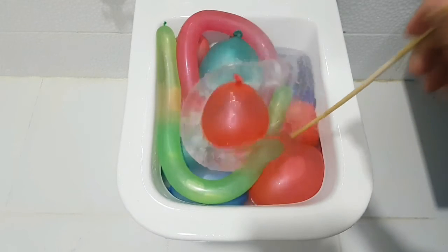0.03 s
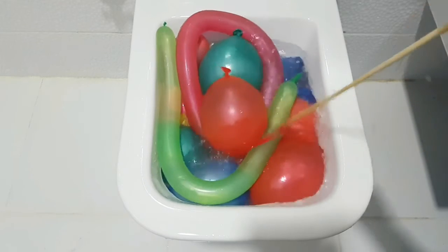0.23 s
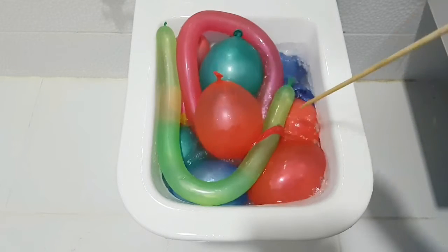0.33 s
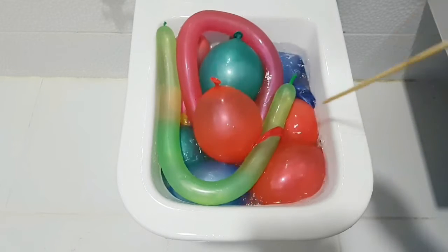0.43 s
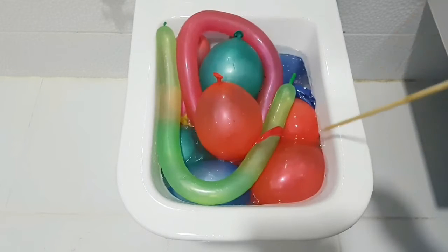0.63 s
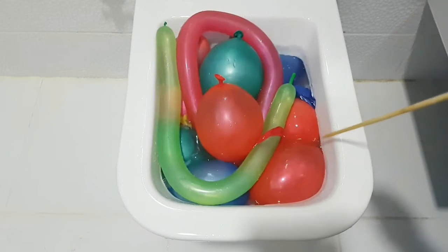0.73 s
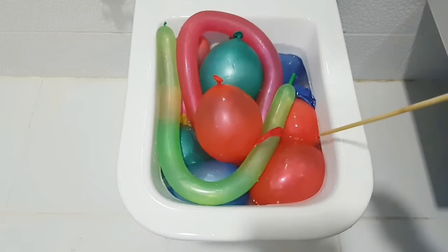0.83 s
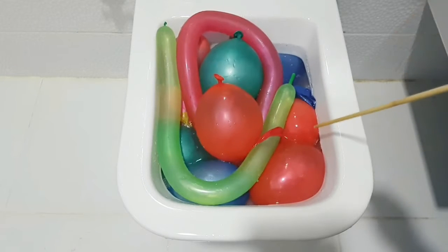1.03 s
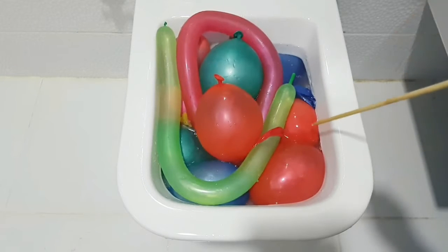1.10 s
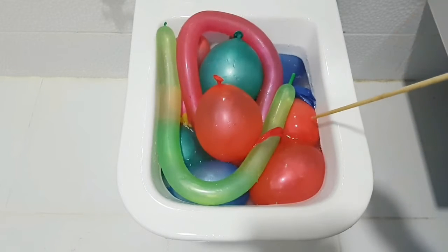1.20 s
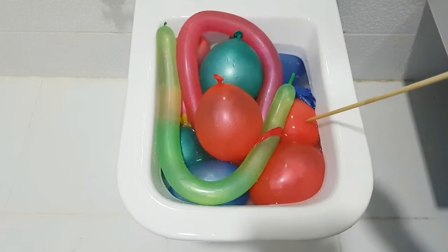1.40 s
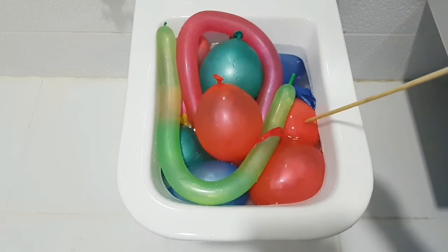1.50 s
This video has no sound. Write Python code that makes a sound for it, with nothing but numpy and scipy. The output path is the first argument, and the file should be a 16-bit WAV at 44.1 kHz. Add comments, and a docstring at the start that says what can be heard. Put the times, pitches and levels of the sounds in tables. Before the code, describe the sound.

A balloon bursts with a sharp, loud bang that rings briefly in a small tiled room.

```python
"""Balloon burst in a tiled room

A long balloon in a basin of balloons is pricked with a stick, in a small tiled room, heard in stereo.
Rubber rips as shaped noise; sharp pressure pulses bounce round the basin and the microphone gets a
deep push. The room answers with decaying noise and sine modes. Scraps rustle and tap (noise), low
thuds ring (sines), and a rumble rises as the stick is pushed at the next balloon, over room tone."""
import sys
import numpy as np
from scipy import signal
from scipy.fft import rfft, irfft
from scipy.io import wavfile

SR = 44100
rng = np.random.default_rng(int(sys.argv[2]) if len(sys.argv) > 2 else 0)


def to_wav(sig):
    """Store sig (one row per channel, or 1-D mono) as 16-bit WAV at the path in sys.argv[1].

    Samples outside -1..1 are clipped; the rate is SR.
    """
    pcm = np.clip(np.atleast_2d(sig), -1, 1) * 32767
    pcm = np.round(pcm).astype(np.int16)
    wavfile.write(sys.argv[1], SR, pcm.T)  # frames by channels


N = 68355  # length [samples]

# Colour of the ripping rubber: (frequency [Hz], relative level per Hz [dB])
RIP_COLOUR = [(60, -44), (110, -29.5), (300, -11.5), (750, -4), (1300, -5.5), (3400, 2.5), (5500, -14.5),
              (8500, -13), (11000, -10.5), (15000, -13)]
# Pressure pulse and its bounces off the basin: (time [s], level [dB], Gaussian width [ms])
PRESSURE_PULSES = [(.20215, 0, .055), (.2033, -11, .09), (.2046, -9, .11)]
# Colour of the room's diffuse ring: (frequency [Hz], relative level per Hz [dB])
ROOM_COLOUR = [(40, -43.5), (100, -30.5), (170, -28.5), (240, -22), (350, -4.5), (500, -6.5), (630, -9),
               (830, -3), (1200, -3), (1700, -2.5), (2400, 0.5), (3300, -1), (5000, -6.5), (8500, -12),
               (12500, -10.5), (15000, -19)]
# Decay of the diffuse ring at its full rate: (frequency [Hz], time to fall 60 dB [s])
ROOM_DECAY = [(100, 0.74), (350, 0.64), (800, 0.72), (2200, 0.5), (4000, 0.43), (7500, 0.39), (13000, 0.31)]
# Standing waves between the tiles: (frequency [Hz], relative level [dB], time to fall 60 dB [s])
STANDING_WAVES = [(330, -9, .8), (392, -6, .73), (518, -5, .7), (771, 1, .45), (834, 1, .5), (962, 0, .45),
                  (1129, -4, .6), (1567, -3, .45), (1672, -1, .42), (1969, 3, .45), (2431, 4, .45),
                  (3290, 2, .38), (3570, -2, .38), (3876, -3, .36), (6491, -7, .35)]
# Likeness of the left and right channels: (frequency [Hz], correlation [-1 to 1])
STEREO_LIKENESS = [(60, .88), (300, .82), (640, .62), (1200, -.15), (2200, .12), (7000, .04), (15000, .03)]
# Stereo balance: (frequency [Hz], left minus right [dB])
STEREO_BALANCE = [(30, -1.5), (150, -4), (380, -5), (750, -3.8), (2400, -2.5), (4400, -2.5), (8500, 0.5),
                  (15000, 2.5)]
# Level of the rustling scraps: (time [s], level [dB])
RUSTLE_LEVELS = [(.4, -67), (.6, -66), (.67, -62), (.8, -67), (.92, -63), (1.101, -73)]
# Colour of the rustle: (frequency [Hz], relative level per Hz [dB])
RUSTLE_COLOUR = [(300, -12.5), (900, 5.5), (2800, -2), (5000, -5), (9000, -8), (14000, -9)]
# Light taps of scraps and stick:
# (time [s], level [dB], centre [Hz], width [octaves], tail level relative to the tap [dB])
LIGHT_TAPS = [(0.665, -50, 1140, 0.98, -4), (0.752, -62.5, 2400, 0.49, 5.5), (.7815, -55, 2980, 2, -9),
              (.911, -44.5, 2100, 0.74, -14), (.926, -53, 2400, 0.78, -9.5), (0.959, -55, 2160, .6, -12),
              (1.437, -52, 13200, 0.26, -30), (1.456, -45, 1500, 0.13, -21.5),
              (1.474, -53.5, 1880, 0.6, -18)]
# Colour of the rumble: (frequency [Hz], relative level per Hz [dB])
RUMBLE_COLOUR = [(25, -12), (50, 4), (85, -12), (150, 1.5), (230, -2.5), (400, -3), (650, -9.5),
                 (1000, -16), (1800, -22), (3500, -38), (8000, -45)]
# Hollow low thuds among the balloons: (time [s], level [dB], frequency [Hz], swell [s])
THUDS = [(.202, -43.5, 184, 0.0052), (0.274, -47.5, 165.6, 0.032), (1.182, -43.5, 157, 0.021),
         (1.264, -53, 132, .008), (1.305, -44, 157, 0.0062), (1.331, -49, 55.5, .012),
         (1.396, -44.5, 390, 0.0033), (1.49, -48.5, 167.3, 0.013)]
# Colour of the room tone: (frequency [Hz], relative level per Hz [dB])
ROOM_TONE_COLOUR = [(25, 2), (48, -3.5), (80, -16.5), (160, -2), (400, -1), (650, -4), (1100, -10),
                    (2400, -16), (4500, -23), (9000, -27.5), (14000, -26.5)]

# T60 is the time a sound takes to fall 60 dB; RIP_RELEASE_S is an exponential time constant.
RIP_S, RIP_LENGTH_S, RIP_ATTACK_S, RIP_RELEASE_S, RIP_DB = .1988, .0045, .00041, .004, -16.5
BURST_LOW_CUT_HZ, PULSE_LEFT_MINUS_RIGHT_DB = 540, .5
REBOUND_HZ, REBOUND_T60_S, REBOUND_DB = 3230, .0016, -9.5  # level relative to its pulse
PUFF_DB, PUFF_HZ, PUFF_T60_S = -44, 37.64, .028
ROOM_START_S, ROOM_BUILD_S, ROOM_DB = .2025, .0084, -17
ROOM_KNEE_S, ROOM_EARLY_SHARE = .09, .6  # until the knee, only this share of the full decay rate
LATE_DB, LATE_STRETCH = -20, 2.84  # a faint ring under the first, this many times longer
MODES_DB = -29
MODE_WIDTH_HZ, MODE_SHARE = 12, .63  # share of the diffuse amplitude removed at each mode
BUMP_T60_S = .089
TAP_ATTACK_S, TAP_T60_S, TAP_TAIL_T60_S = .0008, .02, .55
RUSTLE_GRAIN_DB, RUSTLE_GRAIN_HZ = 3, 298.7
RUMBLE_S, RUMBLE_ATTACK_S, RUMBLE_DB = 1.157, .096, -48
RUMBLE_FADE_START_S, RUMBLE_FADE_DB_PER_S = 1.4, 76
RUMBLE_LUMP_DB, RUMBLE_LUMP_HZ = 1, 45
FLOOR_DB, FLOOR_RISE_DB, FLOOR_RISE_S = -61.5, 1.5, 1
CUTOFF_HZ = 14500


def from_db(db):
    """Decibels to amplitude gain."""
    return 10 ** (np.asarray(db) / 20)


def at_hz(points, hz):
    """Read a table on a log-frequency axis."""
    table_hz, values = np.transpose(points)
    return np.interp(np.log(np.maximum(hz, 1)), np.log(table_hz), values)


def since(s):
    """Seconds since a moment, zero before it."""
    return np.maximum(np.arange(N) / SR - s, 0)


def ramp(s, length):
    """Rise from 0 to 1, starting at a moment."""
    return np.minimum(since(s) / max(length, 1e-5), 1)


def decay(age, t60):
    """Gain of a ring that loses 60 dB in t60 seconds."""
    return np.exp(-np.log(1000) * age / t60)


def pan(db):
    """Left and right gains for a level difference, left minus right."""
    return from_db(np.array([[.5], [-.5]]) * db)


def flutter(db, hz):
    """A randomly wavering gain of rms 1; db is the rms swing, hz the corner of its low-pass."""
    spectrum = rfft(rng.standard_normal(N))
    low_pass = 1 / (1 + (np.fft.rfftfreq(N, 1 / SR) / hz) ** 4)
    slow = irfft(spectrum * low_pass, N)
    gain = from_db(db * slow / slow.std())
    return gain / np.sqrt(np.mean(gain ** 2))


def noise(colour):
    """Random-phase stereo noise of a given colour, likeness and balance; overall rms 1."""
    hz = np.fft.rfftfreq(N, 1 / SR)
    mid, side = np.exp(2j * np.pi * rng.random((2, len(hz))))
    alike = at_hz(STEREO_LIKENESS, hz)
    # side enters the two channels with opposite signs, making them differ
    pair = np.sqrt(1 + alike) * mid + np.sqrt(1 - alike) * side * [[1], [-1]]
    gain = from_db(at_hz(colour, hz)) * pan(at_hz(STEREO_BALANCE, hz)) * (hz > 10)
    x = irfft(pair * gain, N)
    return x / np.sqrt(np.mean(x ** 2))


def burst():
    """The tear races along the rubber; air escapes in narrow pulses, each with a brief rebound."""
    t = np.arange(N) / SR
    rip_envelope = ramp(RIP_S, RIP_ATTACK_S) * np.exp(-since(RIP_S + RIP_LENGTH_S) / RIP_RELEASE_S)
    out = from_db(RIP_DB) * rip_envelope * noise(RIP_COLOUR)
    for s, db, width_ms in PRESSURE_PULSES:
        pulse = np.exp(-.5 * ((t - s) * 1000 / width_ms) ** 2)
        ring = np.sin(2 * np.pi * REBOUND_HZ * since(s)) * decay(since(s), REBOUND_T60_S)
        rebound = from_db(REBOUND_DB) * ring
        out += from_db(db) * pan(PULSE_LEFT_MINUS_RIGHT_DB) * (rebound - pulse)
    low_cut = signal.butter(2, BURST_LOW_CUT_HZ, "high", fs=SR, output="sos")
    return signal.sosfilt(low_cut, out)


def puff():
    """The released air gives the microphone one soft, deep push: a fast-dying low sine."""
    age = since(ROOM_START_S)
    return from_db(PUFF_DB) * np.sin(2 * np.pi * PUFF_HZ * age) * decay(age, PUFF_T60_S)


def room():
    """Dense reflections build up and die away, slowly at first, the top treble soonest."""
    hz = np.fft.rfftfreq(N, 1 / SR)
    field = rfft(noise(ROOM_COLOUR))
    for mode_hz, _, _ in STANDING_WAVES:
        notch = np.exp(-.5 * ((hz - mode_hz) / MODE_WIDTH_HZ) ** 2)
        field = field * (1 - MODE_SHARE * notch)
    age = since(ROOM_START_S)
    slowed_age = age - (1 - ROOM_EARLY_SHARE) * np.minimum(age, ROOM_KNEE_S)
    out = 0
    # overlapping bands that add up to the whole field, each with its own decay
    centres = np.geomspace(60, 15000, 17)
    for centre, weights in zip(centres, np.eye(len(centres))):
        band = irfft(field * at_hz(np.c_[centres, weights], hz), N)
        t60 = at_hz(ROOM_DECAY, centre)
        late = from_db(LATE_DB) * decay(age, LATE_STRETCH * t60)
        out = out + band * np.hypot(decay(slowed_age, t60), late)
    return from_db(ROOM_DB) * ramp(ROOM_START_S, ROOM_BUILD_S) * out


def standing_waves():
    """The room's strongest modes ring as sines, in a different phase at each microphone."""
    age = since(ROOM_START_S)
    out = 0
    for hz, db, t60 in STANDING_WAVES:
        # this phase gap gives the sine the wanted left-right correlation
        gap = rng.choice([-1, 1]) * np.arccos(at_hz(STEREO_LIKENESS, hz))
        phase = rng.uniform(0, 2 * np.pi) + np.array([[.5], [-.5]]) * gap
        gain = from_db(MODES_DB + db) * pan(at_hz(STEREO_BALANCE, hz))
        out = out + gain * np.sin(2 * np.pi * hz * age + phase) * decay(age, t60)
    return ramp(ROOM_START_S, ROOM_BUILD_S) * out


def bumps():
    """Each thud swells and rings out on one low note."""
    out = 0
    for s, db, hz, swell in THUDS:
        gain = from_db(db) * pan(at_hz(STEREO_BALANCE, hz))
        envelope = ramp(s, swell) * decay(since(s + swell), BUMP_T60_S)
        out = out + gain * envelope * np.sin(2 * np.pi * hz * since(s))
    return out


def taps():
    """Each tap is a short noise burst around one pitch, with a longer tail of the same colour."""
    out = 0
    grid_hz = np.geomspace(50, 16000, 80)
    for s, db, hz, octaves, tail_db in LIGHT_TAPS:
        off = np.log2(grid_hz / hz) / octaves
        colour = -20 * np.log10(1 + off ** 2 + (off / 1.4) ** 4)
        tail = from_db(tail_db) * decay(since(s), TAP_TAIL_T60_S)
        envelope = ramp(s, TAP_ATTACK_S) * (decay(since(s), TAP_T60_S) + tail)
        out = out + from_db(db) * envelope * noise(np.c_[grid_hz, colour])
    return out


def rustle():
    """Torn rubber slides and settles among the other balloons: finely wavering noise."""
    level_db = np.interp(np.arange(N) / SR, *np.transpose(RUSTLE_LEVELS))
    level = ramp(RIP_S, RIP_ATTACK_S) * from_db(level_db)
    return level * flutter(RUSTLE_GRAIN_DB, RUSTLE_GRAIN_HZ) * noise(RUSTLE_COLOUR)


def rumble():
    """The stick pushed at the next balloon: low, lumpy rubbing noise that rises, holds and fades."""
    level_db = RUMBLE_DB - RUMBLE_FADE_DB_PER_S * since(RUMBLE_FADE_START_S)
    level = ramp(RUMBLE_S, RUMBLE_ATTACK_S) * from_db(level_db)
    return level * flutter(RUMBLE_LUMP_DB, RUMBLE_LUMP_HZ) * noise(RUMBLE_COLOUR)


def room_tone():
    """Faint background rumble and hiss, growing a little stronger from the rip on."""
    level_db = FLOOR_DB + FLOOR_RISE_DB * ramp(RIP_S, FLOOR_RISE_S)
    return from_db(level_db) * noise(ROOM_TONE_COLOUR)


def scene():
    """The burst, its room, the small sounds after it and the background."""
    bang = burst() + puff()
    ring = room() + standing_waves()
    aftermath = bumps() + taps() + rustle() + rumble()
    return bang + ring + aftermath + room_tone()


def record(dry):
    """Overload is clipped, then a steep low-pass cuts the top."""
    clipped = np.clip(dry, -1, 1)
    top_cut = signal.ellip(10, .1, 80, CUTOFF_HZ, fs=SR, output="sos")
    return signal.sosfilt(top_cut, clipped)


dry = scene()
out = record(dry)
to_wav(out)
```